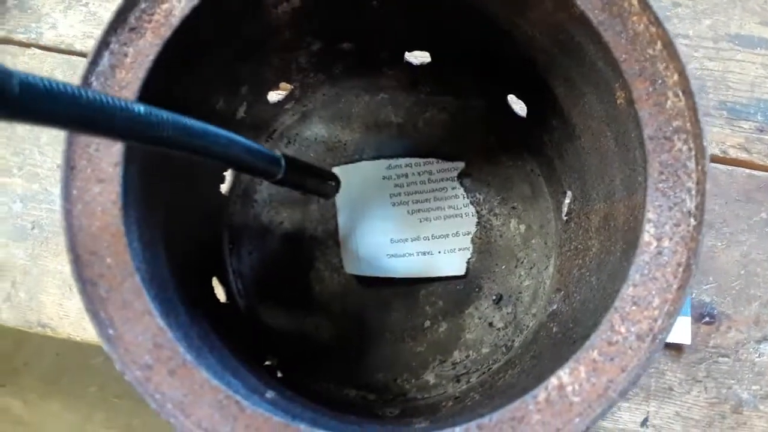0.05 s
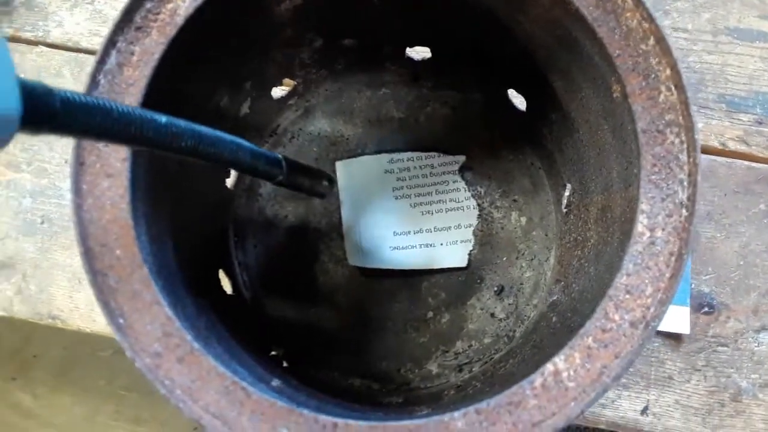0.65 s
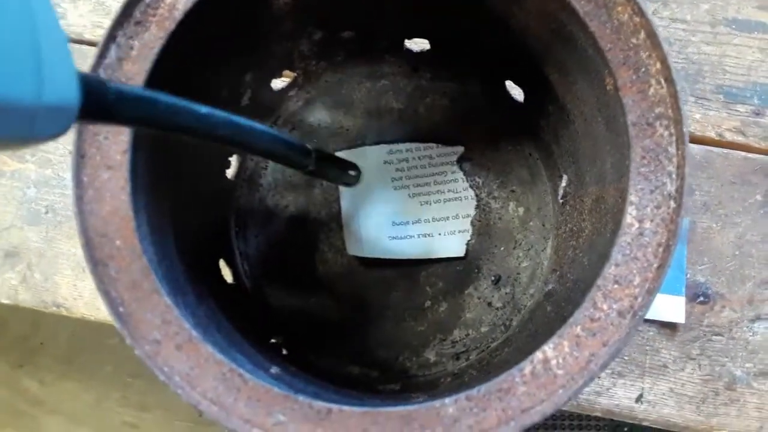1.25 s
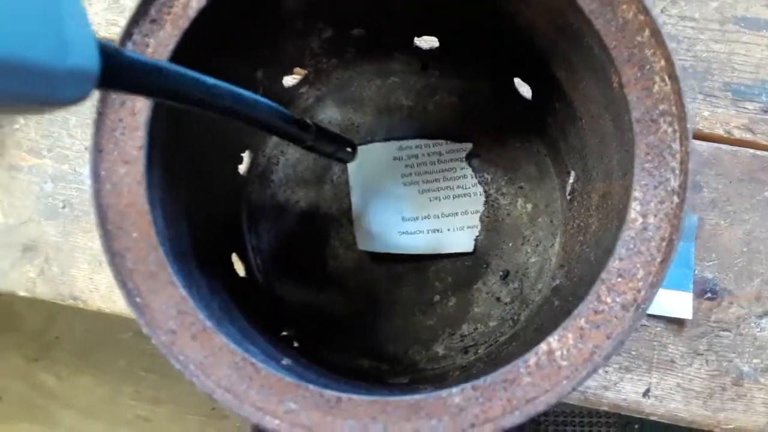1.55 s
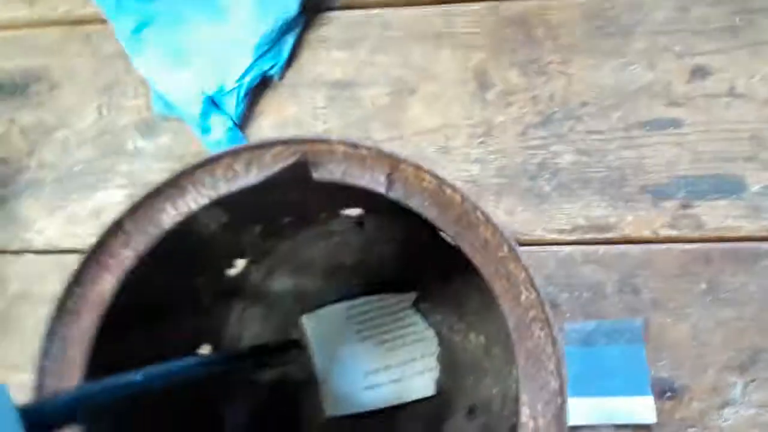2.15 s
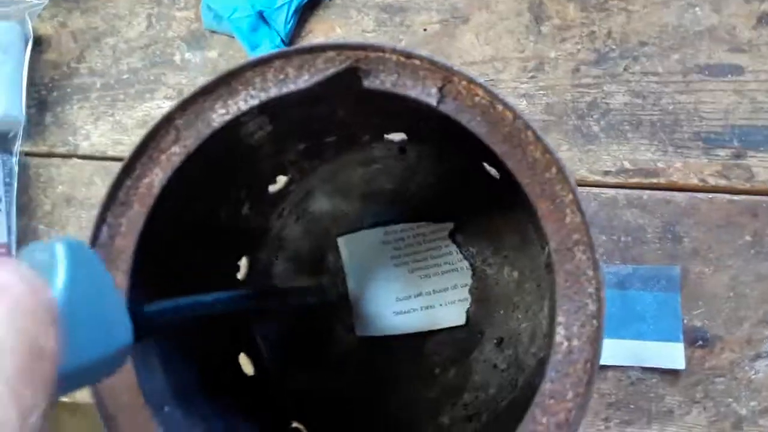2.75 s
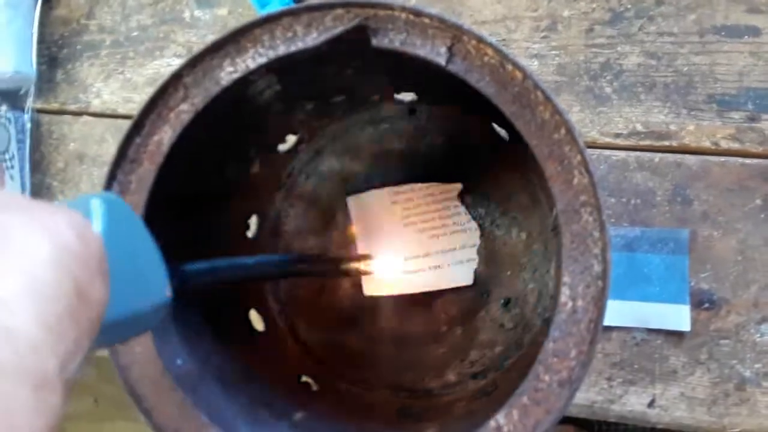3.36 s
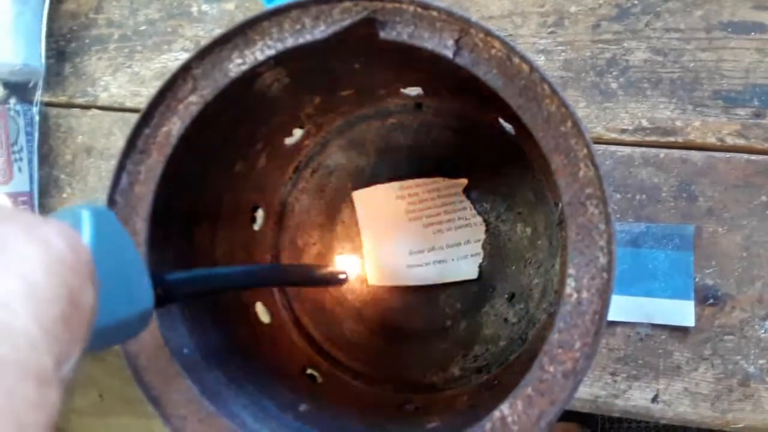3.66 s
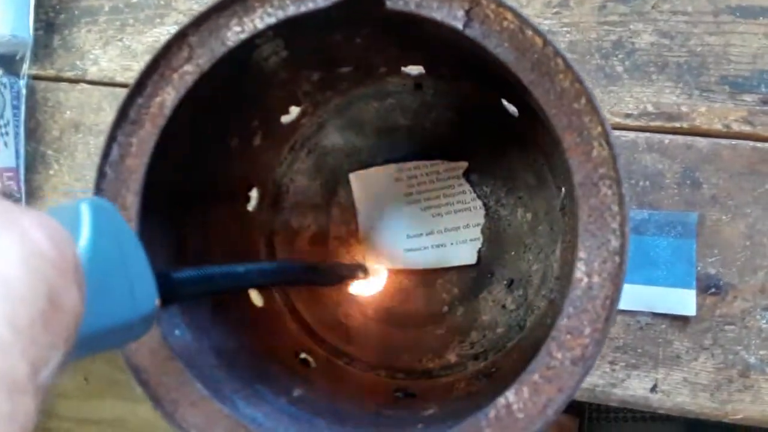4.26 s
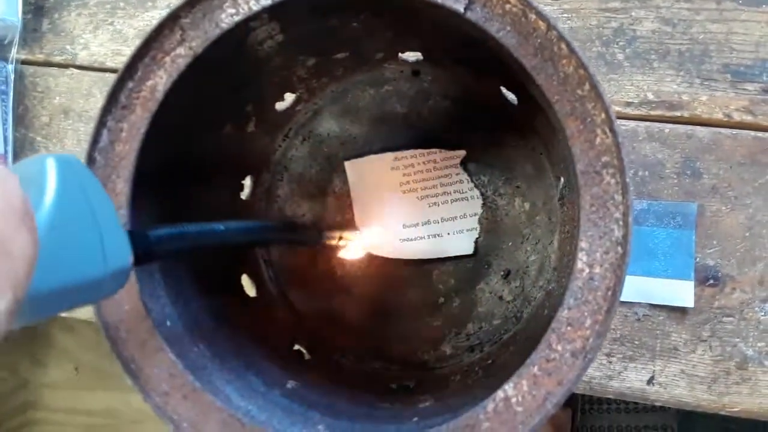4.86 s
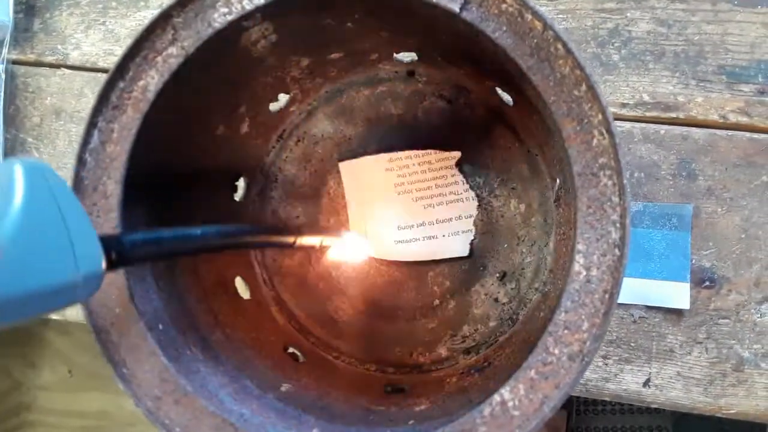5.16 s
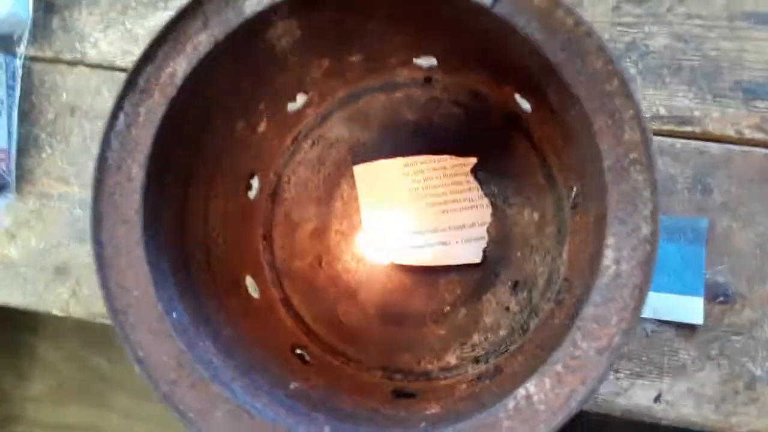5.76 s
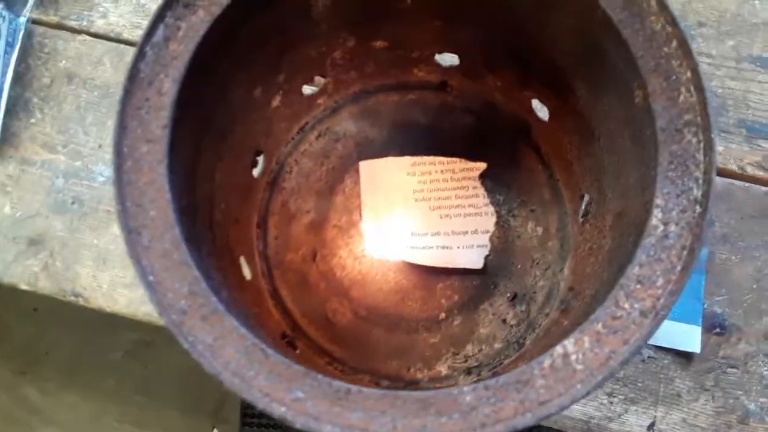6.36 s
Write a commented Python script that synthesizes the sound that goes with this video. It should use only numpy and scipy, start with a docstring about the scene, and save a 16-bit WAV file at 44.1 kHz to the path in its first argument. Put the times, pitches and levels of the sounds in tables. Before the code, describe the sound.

A low workshop hum and a very faint, thin gas hiss open the scene. Close to the microphone, a utility lighter's plastic trigger ticks lightly, then gives a quick run of dry clicks and creaks from about 0.8 to 1.2 seconds. At 1.8 seconds something ignites in an iron pot with a loud, sharp pop and a short, hollow ring; the background sinks for a second and returns. More clicks and creaks come at 3.1 seconds, followed by a second sharp pop at 3.3, with dull knocks on pot and bench. A soft rush of flame begins and fades while the hum dips again until about 4.4. From 5.1 to 5.4 seconds the trigger clicks again, with one loud snap at 5.3. A scrap of paper flares faintly around 6.1 seconds, and one small tick comes near 6.6.

```python
"""Close, dry plastic ticks, creaks and snaps: a utility lighter clicked again and again in an iron pot.
Twice something in the pot ignites with a sharp pop, and the trapped air rings on.
Under the clicks sit dull knocks on pot and bench, a thin hiss of gas and a soft rush of flame.
Each pop ducks the automatic gain for a second, so the hum of the workshop sinks and returns."""
import sys
import numpy as np
from scipy import signal
from scipy.fft import rfft, irfft
from scipy.io import wavfile

SR = 44100
rng = np.random.default_rng(int(sys.argv[2]) if len(sys.argv) > 2 else 0)


def wav_out(sig):
    """Save sig, one row per channel (or a flat mono array), as 16-bit PCM at SR to the path in sys.argv[1]."""
    wavfile.write(sys.argv[1], SR, np.round(np.clip(np.atleast_2d(sig).T, -1, 1) * 32767).astype(np.int16))


N = 291501
TIME = np.arange(N) / SR

# Trigger clicks. Each row: start in seconds, relative level in dB, treble in dB, low body in dB,
# how freely the housing rings.
TRIGGER_CLICKS = [(0.1165, -46, -1, 3, 1.2), (0.6, -31.5, -17.5, -4.5, .65), (0.6283, -42, -31, 4, 0.92),
                  (0.819, -41.5, 7, 5, .6), (0.8404, -35.5, 12, 1, .4), (0.8458, -28.5, 0, 10.5, .25),
                  (0.945, -26.5, 4.5, -7.5, 0.72), (1.077, -32, -3.5, 4, 0.27), (1.0900, -31.5, -7, -5, .3),
                  (1.1078, -39.5, 4, 9, .5), (1.1383, -27.5, -12, -2, 0.45), (1.1545, -35.5, 9, -10, .8),
                  (1.158, -31.5, 7, -0.5, .35), (3.0806, -27, 3.5, -1, 1.0), (3.1237, -21.5, 4, -4, 0.28),
                  (3.1454, -28, 2, 0, 0.72), (3.1848, -28.5, -6, -4.5, 0.68), (3.195, -33.5, 1, -4, .4),
                  (3.2024, -26.5, -7, -5, .25), (3.2150, -28, 7.5, 1, .5), (3.2295, -24.5, -6, -5, .45),
                  (5.1210, -21.5, -24, -3.5, 1.33), (5.1978, -42, -11, 9.5, 0.43),
                  (5.2267, -40, -19, 5.5, .8), (5.2522, -24, 0, 1, 1.3), (5.2897, -6.5, 3, -3.5, 1.48),
                  (5.362, -25.5, -4.5, -3.5, 1.08), (6.5990, -36.5, -43, -6, 1.3)]
# Modes of the lighter's housing. Each row: pitch in Hz, width in Hz, lift over the shell in dB.
HOUSING_MODES = [(2340, 120, 11), (2540, 330, 10.5), (3740, 320, 7.5), (4540, 300, 10), (5350, 400, 3),
                 (6300, 400, 2), (7820, 380, 8), (13250, 850, 8.5)]
# Modes of the trigger lever. Each row: pitch in Hz, width in Hz, lift over the shell in dB.
LEVER_MODES = [(1620, 270, 13.5), (2130, 150, 2.5), (2810, 240, 16), (4480, 300, 10), (8350, 450, 7.5)]
# Broad tone of the plastic shell. Each row: frequency in Hz, gain in dB.
SHELL_EQ = [(60, -28), (250, -3), (650, -2), (1250, -5.5), (1750, 0.5), (3100, -6.5), (5500, -11),
            (8500, -12), (10300, -20.5), (12500, -19.5), (16000, -19.5)]
# Pans the clicks' midrange ring to the right; their bass and top still lean left.
# Each row: frequency in Hz, added left minus right in dB.
CLICK_PAN = [(400, -2), (1500, -8), (2300, -8), (4500, -4.5), (7000, -2), (13000, 0)]
# The trigger sliding under the finger. Each row: start in seconds, end in seconds, level in dB.
TRIGGER_SQUEEZES = [(0.835, 0.906, -59), (1.064, 1.15, -56), (3.065, 3.144, -49.5), (3.182, 3.25, -46),
                    (5.239, 5.298, -48)]
# Ignitions. Each row: start in seconds, blast in dB, crack in dB, crack swell in ms, thump in dB,
# thump pitch in Hz, thump decay in seconds, ring in dB, hollow pitch in Hz, pot-bottom echo delay in ms.
IGNITIONS = [(1.7849, -0.5, 3.5, .45, -2.5, 75.8, 0.0057, 8, 2505, 0.53),
             (3.3228, -11, 7.5, 1, -8, 107.3, 0.0044, 7.5, 2175, 0.93)]
# Tone of a pop's crack. Each row: frequency in Hz, gain in dB.
CRACK_EQ = [(100, -10), (400, -7), (650, -5.5), (1100, 2), (1400, 1), (2300, 2.5), (3300, -7), (4500, -4.5),
            (6500, -17.5), (7900, -12.5), (10000, -19), (13300, -7.5), (16000, -16.5)]
# Tone of the sound trapped in the pot. Each row: frequency in Hz, gain in dB.
POT_EQ = [(60, -15.5), (300, -15), (600, -22.5), (1150, -20.5), (1600, -13), (2100, 0.5), (2650, -2.5),
          (3100, -7.5), (4200, -5.5), (5500, -11.5), (7800, -9), (10300, -17.5), (13400, -7),
          (16000, -11.5)]
# Knocks on pot and bench. Each row: start in seconds, level in dB, pitch in Hz, decay in seconds.
DULL_KNOCKS = [(2.314, -46, 1070, 0.0048), (3.355, -24, 238, 0.0047), (3.362, -34.5, 430, .008),
               (3.387, -29.5, 262, 0.0051), (3.4080, -11, 250, 0.00083)]
# Tone of the flame. Each row: frequency in Hz, gain in dB.
FLAME_EQ = [(100, -28.5), (450, -5), (1050, 7), (2100, 4.5), (3200, -13.5), (6000, -24), (15000, -26)]
# Escaping gas. Each row: start in seconds, release in seconds, upper band's level in dB, its pitch in Hz.
GAS_FLOWS = [(0, 0.804, -76, 8060), (1.16, 1.848, -77, 8200), (1.901, 2.75, -80, 8500),
             (2.801, 3.33, -77.5, 8400), (5.999, 6.095, -77.5, 8250)]
# Workshop room tone. Each row: frequency in Hz, gain in dB.
ROOM_TONE_EQ = [(20, -36), (45, -21), (80, -6.5), (130, -5.5), (260, -11), (400, -13), (680, -18.5),
                (1200, -14.5), (2200, -16), (3200, -25.5), (5400, -38), (8300, -38), (10200, -42),
                (15500, -37)]
# Hum lines and hollow pot resonances. Each row: pitch in Hz, width in Hz, lift over the room tone in dB.
HUM_PEAKS = [(126, 25, 5.5), (218, 14, 12), (418, 40, 7), (1026, 80, 1), (2890, 110, 6), (3680, 43, 2.5),
             (4050, 130, 2)]
# Reverb of pot and room. Each row: frequency in Hz, seconds to fall 60 dB before stretching.
REVERB_TIMES = [(150, 0.56), (700, 0.42), (2300, .2), (5000, 0.22), (9000, 0.21), (15000, 0.23)]


def lighter(level_db=16, room_db=-7.0, contact_ms=1.255):
    """The trigger's clicks, each with its own echoes from the pot and the room."""
    out = np.zeros((2, N))
    for start, db, treble_db, body_db, ring in TRIGGER_CLICKS:
        direct = stereo(click(db, treble_db, body_db, contact_ms, ring), lag_ms=.3, left_db=4)
        echoes = signal.fftconvolve(direct, reflections(stretch=0.66, rise_s=0.0009), axes=1)
        add(out, start, direct)
        add(out, start, amp(room_db) * echoes)
    left = colour(out[:1], lambda hz: read(CLICK_PAN, hz) / 2)
    right = colour(out[1:], lambda hz: -read(CLICK_PAN, hz) / 2)
    return amp(level_db) * np.vstack([left, right])


def click(db, treble_db, body_db, contact_ms, ring, lever=0.95):
    """Plastic strikes plastic; what does not ring the housing goes into the trigger lever."""
    def plastic_db(hz):
        housing_db = ring * resonances_db(HOUSING_MODES, hz)
        lever_db = lever * max(1 - ring, 0) * resonances_db(LEVER_MODES, hz)
        tilt_db = read([(1000, body_db), (2000, 0.03), (2800, 0.00055), (12000, treble_db)], hz)
        return read(SHELL_EQ, hz) + housing_db + lever_db + tilt_db
    return amp(db) * unit_energy(colour(chatter(contact_ms), plastic_db))


def chatter(swell_ms, size=2048):
    """A brief burst of tiny blows that swells and dies, about equally strong at all pitches."""
    age = 1000 * np.arange(size) / SR / max(swell_ms, .1)
    spectrum = rfft(rng.standard_normal((2, size)) * age * np.exp(-age))
    whitened = irfft(spectrum / (abs(spectrum) + 1e-12), size)
    return unit_energy(whitened * np.exp(-age / 10))


def trigger_creak(grain_db=4, grains_per_s=1500):
    """Tiny slips of plastic on plastic fill the gaps between the clicks of a squeeze."""
    out = np.zeros((2, N))
    for start, end, db in TRIGGER_SQUEEZES:
        n = max(round((end - start) * SR), 1024)
        slips = (rng.random(n) < grains_per_s / SR) * rng.standard_normal(n)
        slips *= amp(grain_db * np.minimum(rng.exponential(1, n), 3))  # a few grains stick out
        slips *= signal.windows.tukey(n, .4)
        tick = click(0, treble_db=1, body_db=5.5, contact_ms=0.65, ring=0.32)
        rub = signal.fftconvolve(slips[None], tick, axes=1)[:, :n]
        add(out, start, amp(db) * stereo(unit_rms(rub), lag_ms=.3, left_db=-1.5))
    return out


def pops(thump_delay_s=0.0018):
    """A blast, a crack and a low thump that dies within a few cycles; then the pot and room ring on."""
    out, t = np.zeros((2, N)), np.arange(4096) / SR
    age = np.maximum(t - thump_delay_s, 0)
    for (start, blast_db, crack_db, crack_ms, thump_db, thump_hz, decay_s,
         ring_db, hollow_hz, echo_ms) in IGNITIONS:
        crack = unit_energy(colour(chatter(crack_ms), lambda hz: read(CRACK_EQ, hz)))
        thump = amp(thump_db) * np.sin(2 * np.pi * thump_hz * age) * np.exp(-age / decay_s)
        add(out, start, amp(blast_db) * stereo(blast(t, echo_ms), lag_ms=0.89, left_db=5))
        add(out, start, amp(crack_db) * stereo(crack, lag_ms=0.36, left_db=1.5))
        add(out, start, stereo(np.array([thump, thump]), lag_ms=.1, left_db=3.0))
        add(out, start, amp(ring_db) * pot_ring(hollow_hz))
    return out


def blast(t, echo_ms, spike_ms=0.92, echo_gain=0.58):
    """A pressure spike and its echo off the pot's bottom, with the top end softened."""
    age = 1000 * t / spike_ms
    echo_age = np.maximum(1000 * t - echo_ms, 0) / spike_ms
    pressure = (1 - age) * np.exp(-age) - echo_gain * np.e * echo_age * np.exp(-echo_age)
    return colour(np.array([pressure, pressure]), lambda hz: read([(2000, -4.5), (9000, -10.5)], hz))


def pot_ring(hollow_hz, lift_db=5, width_hz=350):
    """Sound bounces around inside the pot, with one hollow pitch standing out."""
    def pot_db(hz):
        return read(POT_EQ, hz) + lift_db / (1 + (2 * (hz - hollow_hz) / width_hz) ** 2)
    return unit_energy(colour(reflections(stretch=0.85, rise_s=0.0072), pot_db))


def knocks():
    """Dull bumps against pot and bench that die within a few cycles."""
    out, t = np.zeros((2, N)), np.arange(4096) / SR
    for start, db, hz, decay_s in DULL_KNOCKS:
        add(out, start, -amp(db) * np.sin(2 * np.pi * hz * t) * np.exp(-t / decay_s))
    return out


def flame(lit_s=3.33, rise_s=.12, jet_db=-55.5, settle_db_per_s=8.5,
          flare_s=6.12, flare_width_s=0.058, flare_db=-60.5):
    """The soft rush of the jet, lit by the second pop and settling; later a scrap of paper flares."""
    rush = unit_rms(colour(rng.standard_normal((2, N)), lambda hz: read(FLAME_EQ, hz)))
    age = np.maximum(TIME - lit_s, 0)
    jet = np.minimum(age / rise_s, 1) * amp(jet_db - settle_db_per_s * age)
    paper = amp(flare_db) / (1 + ((TIME - flare_s) / flare_width_s) ** 2)
    return stereo(rush * np.hypot(jet, paper), lag_ms=.1, left_db=-1.0)


def gas_hiss(rise_s=0.031, fall_s=.08, low_ratio=.45, low_db=4):
    """Hiss in two resonances of the nozzle tube; each flow rises, holds and bleeds off."""
    out = np.zeros((2, N))
    for start, release, db, hz in GAS_FLOWS:
        t = np.arange(0, release - start + .5, 1 / SR)
        flow = np.minimum(t / rise_s, 1) * np.exp(-np.maximum(start + t - release, 0) / fall_s)
        for centre_hz, half_width_hz, lift_db in [(hz, 650, 0), (low_ratio * hz, 600, low_db)]:
            real, imag = rng.standard_normal((2, 2, N))[..., :len(t)]
            fuzz = signal.sosfilt(signal.butter(2, half_width_hz, fs=SR, output="sos"), real + 1j * imag)
            band = (fuzz * np.exp(2j * np.pi * centre_hz * t)).real  # shifted up to the resonance
            add(out, start, amp(db + lift_db) * flow * unit_rms(band))
    return out


def workshop(level_db=-55.5, likeness=0.91, null_hz=950):
    """Steady room tone from all sides, with wavering hum lines, coloured by the pot."""
    hz = np.fft.rfftfreq(N, 1 / SR)
    left, other = rfft(rng.standard_normal((2, N)))
    shared = likeness * np.sinc(hz / null_hz)  # the two sides are alike only in the bass
    right = shared * left + np.sqrt(1 - shared ** 2) * other
    spectra = np.array([left, right]) * amp(read(ROOM_TONE_EQ, hz) + resonances_db(HUM_PEAKS, hz))
    return stereo(amp(level_db) * unit_rms(irfft(spectra, N)), lag_ms=.1, left_db=-2.0)


def reflections(stretch, rise_s, size=16384):
    """Dense random echoes that build up, then die faster in the treble."""
    hz, t, spectra = signal.stft(rng.standard_normal((2, size)), SR, nperseg=256)
    decay = amp(-60 * t / (stretch * read(REVERB_TIMES, hz)[:, None]))
    tail = signal.istft(spectra * decay, SR, nperseg=256)[1][:, :size]
    build_up = 1 - np.exp(-(np.arange(size) / SR / rise_s) ** 2)
    return unit_energy(tail * build_up)


def stereo(x, lag_ms, left_db):
    """Pans a pair; the right microphone hears it a little later than the left."""
    late = np.pad(x[1], (round(lag_ms * SR / 1000), 0))[:x.shape[1]]
    return np.array([x[0] * amp(left_db / 2), late * amp(-left_db / 2)])


def resonances_db(modes, hz):
    """How far a set of resonances lifts each pitch."""
    lift = sum((amp(db) ** 2 - 1) / (1 + (2 * (hz - f) / width) ** 2) for f, width, db in modes)
    return 10 * np.log10(np.maximum(1 + lift, .1))


def colour(x, db_at, size=4096):
    """Minimum-phase EQ with the gain db_at(Hz): nothing rings ahead of an attack."""
    hz = abs(np.fft.fftfreq(size, 1 / SR))
    log_response = np.conj(signal.hilbert(np.log(amp(db_at(hz)))))
    taps = np.fft.ifft(np.exp(log_response)).real
    return signal.fftconvolve(x, taps[None, :size // 2], axes=1)[:, :x.shape[1]]


def read(points, hz):
    """Straight lines on a log-frequency axis."""
    f, value = np.transpose(points)
    return np.interp(np.log(hz + 1), np.log(f + 1), value)


def add(mix, start_s, sound):
    part = mix[:, max(round(start_s * SR), 0):][:, :sound.shape[-1]]
    part += sound[..., :part.shape[1]]


def amp(db):
    return 10 ** (np.asarray(db) / 20)


def unit_rms(x):
    return x / np.sqrt(np.mean(x ** 2) + 1e-30)


def unit_energy(x):
    return x / np.sqrt(np.sum(x ** 2, axis=-1, keepdims=True) + 1e-30)


def scene():
    """Clicks and pops up front, over a quiet bed of room tone, gas and flame."""
    return lighter() + trigger_creak() + pops() + knocks() + workshop() + gas_hiss() + flame()


def record(dry, threshold=.09, duck_db=14.0, hold_s=1.059, recover_s=0.062, glide_s=0.058, top_hz=16000):
    """A blast of bass ducks the gain, which holds and recovers; peaks clip and the very top is cut."""
    bass = signal.sosfilt(signal.butter(2, 250, fs=SR, output="sos"), dry.mean(0))
    last_blast = np.maximum.accumulate(np.where(abs(bass) > threshold, TIME, -np.inf))
    duck = np.clip((hold_s - (TIME - last_blast)) / recover_s, 0, 1)
    pole = np.exp(-1 / (glide_s * SR))
    for _ in range(2):  # the gain glides, so the pop's attack gets through
        duck = signal.lfilter([1 - pole], [1, -pole], duck)
    clipped = np.clip(dry * amp(-duck_db * duck), -1, 1)
    high_cut = signal.firwin(301, top_hz, window=("kaiser", 9), fs=SR)
    return signal.oaconvolve(clipped, high_cut[None], "same")


dry = scene()
out = record(dry)
wav_out(out)
```